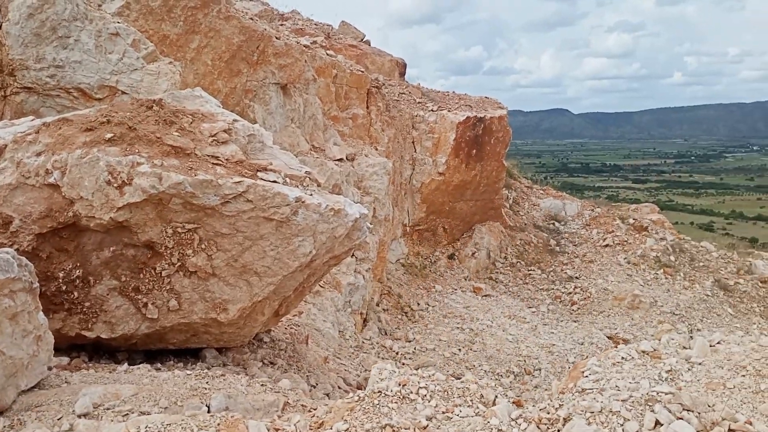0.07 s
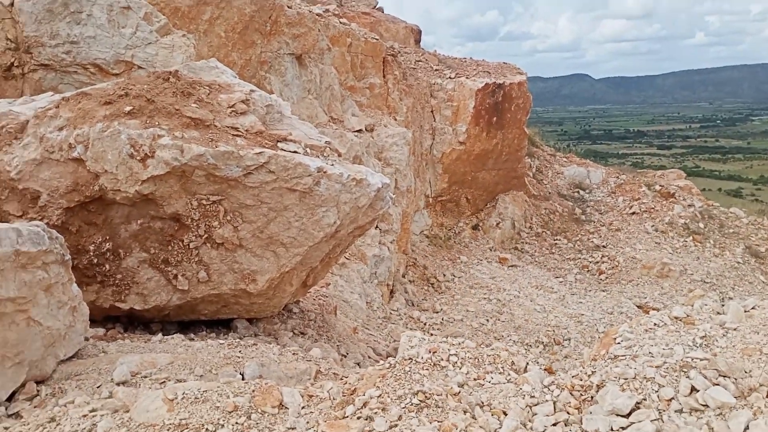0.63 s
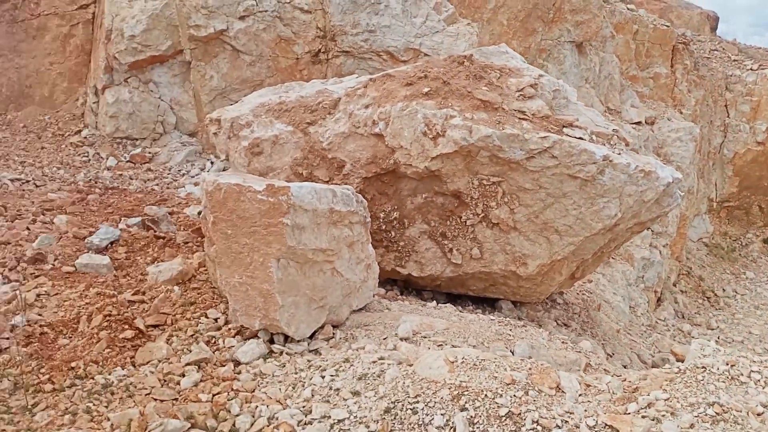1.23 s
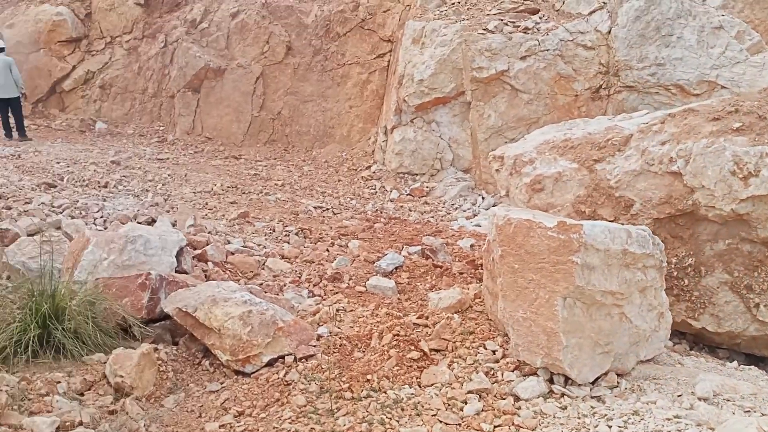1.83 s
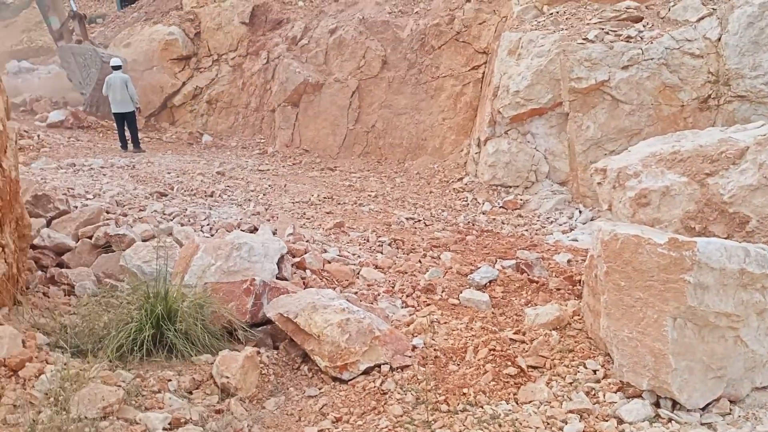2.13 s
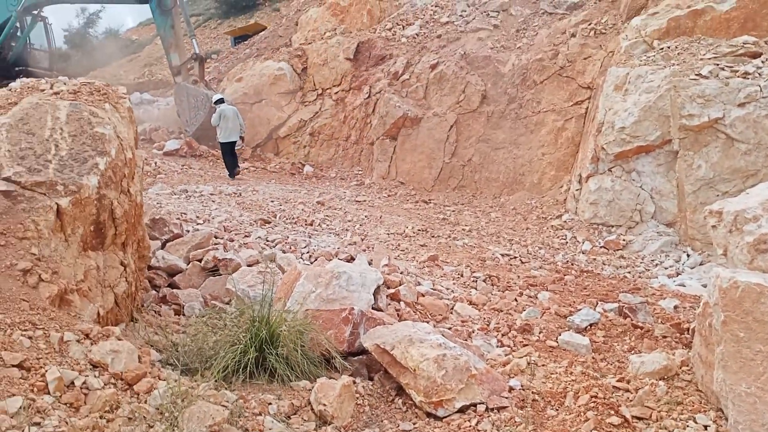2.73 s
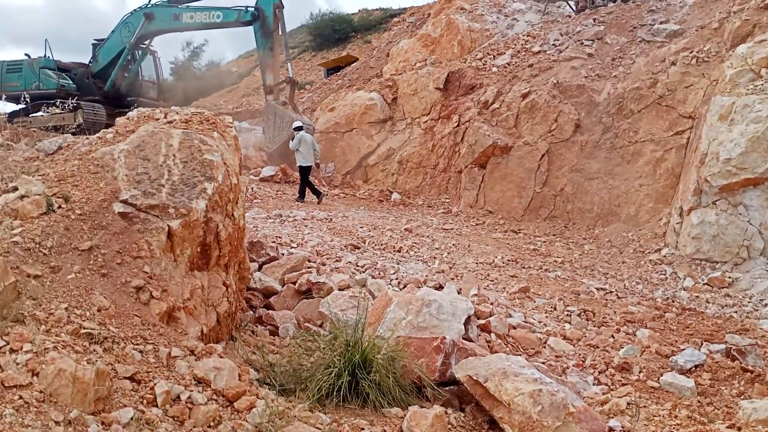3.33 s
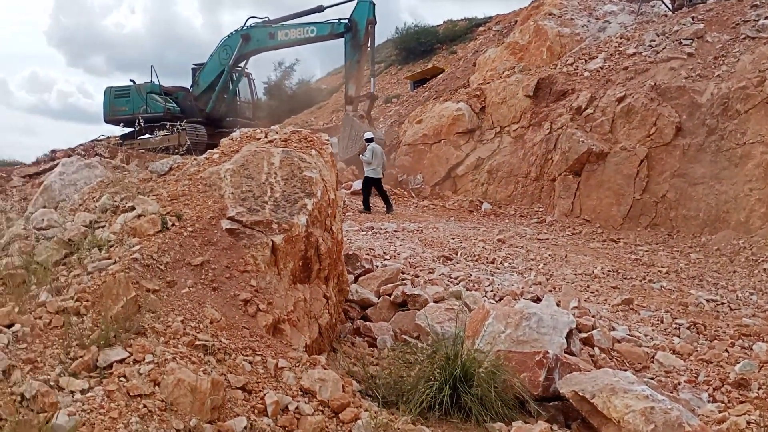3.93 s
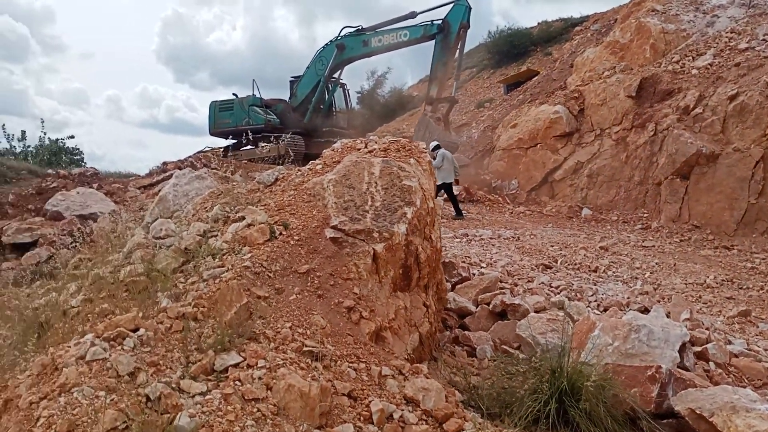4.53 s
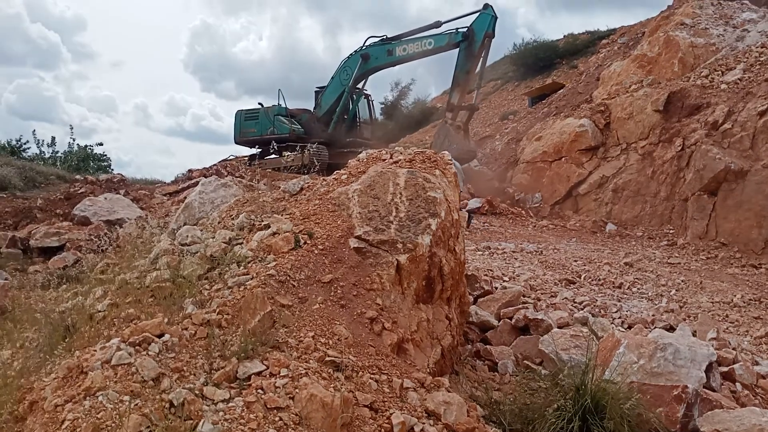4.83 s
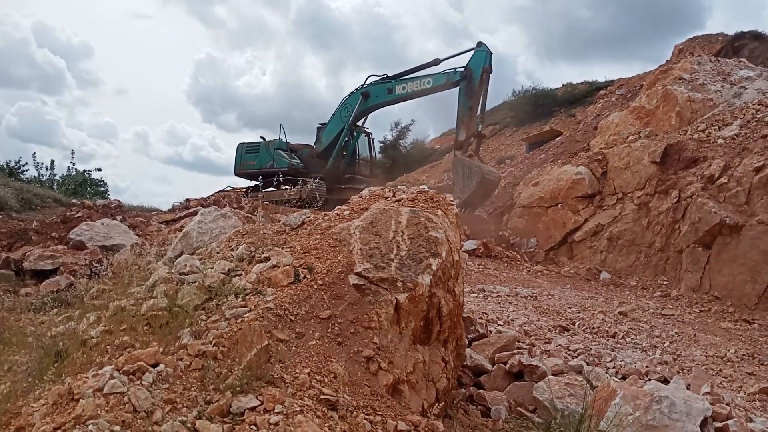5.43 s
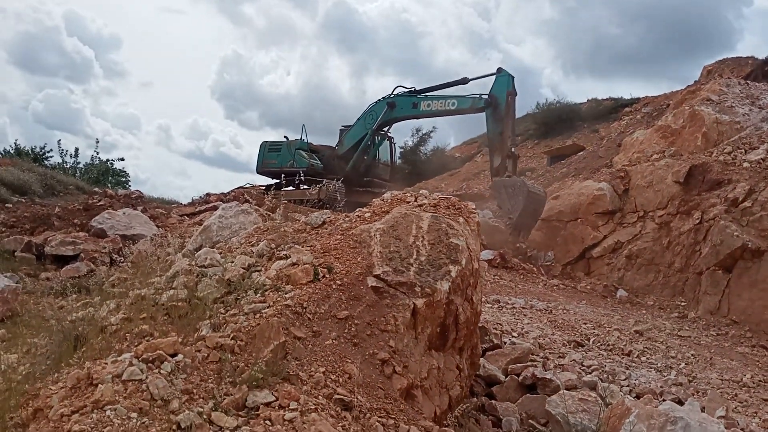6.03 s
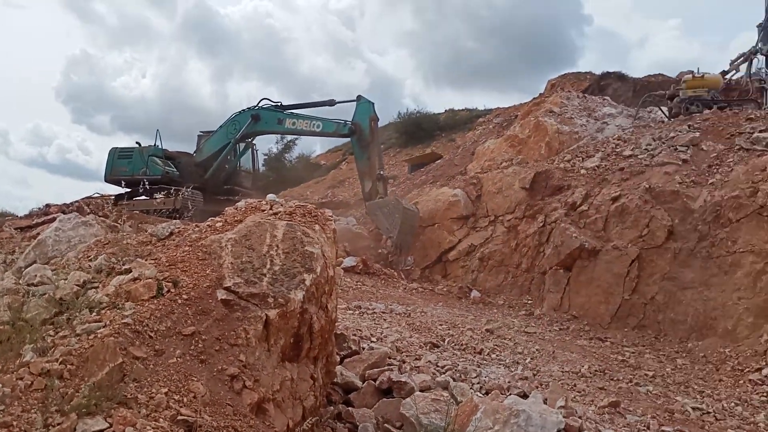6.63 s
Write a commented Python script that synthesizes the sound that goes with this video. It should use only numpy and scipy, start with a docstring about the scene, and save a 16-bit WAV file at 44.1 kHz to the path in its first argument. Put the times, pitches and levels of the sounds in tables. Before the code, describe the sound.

Close footsteps shift quarry rubble, stones clinking and slabs thudding, while far off a diesel excavator hums and its bucket booms softly.

```python
"""Loose quarry rock crunches and clatters under someone's feet, close by.
Each shift of weight drives a burst of small impacts: grit and stones answer first, then slabs rock
and the ground thuds. Single stones clink or hum in their natural modes. Far off an excavator's
diesel drones and rock sets its steel bucket booming. A gritty hiss fades away,
and a faint high whine enters later."""
import sys
import numpy as np
from scipy import signal
from scipy.fft import rfft, irfft
from scipy.io import wavfile

SR = 44100
rng = np.random.default_rng(int(sys.argv[2]) if len(sys.argv) > 2 else 0)


def pcm_store(signal):
    """Save signal as 16-bit PCM."""
    levels = np.round(np.clip(np.atleast_2d(signal), -1, 1) * 32767)
    wavfile.write(sys.argv[1], SR, levels.astype(np.int16).T)


N = 294588

# spectral envelopes: (frequency [Hz], gain [dB])
AIR_SPECTRUM = [(25, -14), (45, -0.5), (65, 0.5), (140, 3), (250, -1.5), (600, -2.5), (1000, -3),
                (2200, -0.5), (3500, -9.5), (7000, -10.5), (10000, -15.5), (15000, 1.5)]
HISS_SPECTRUM = [(100, -51), (500, -26.5), (1000, -16), (1500, 0), (2400, -2.5), (4000, -5), (5500, -13),
                 (7000, -10), (9000, -12), (15000, 1.5)]
THUD_SPECTRUM = [(25, -30), (45, -8.5), (60, -15), (90, -8.5), (160, 0), (250, -5), (340, -14.5), (600, -6),
                 (1200, -55), (4000, -90)]
SLAB_SPECTRUM = [(40, -83.5), (150, -36), (310, -25.5), (420, 9), (530, 3.5), (760, -5.5), (1000, -5),
                 (1400, 1), (2500, -62), (5000, -44)]
GRIT_SPECTRUM = [(30, -68.5), (100, -32.5), (300, -1), (900, -9), (1800, 0.5), (4000, 0.5), (5200, 0.5),
                 (6300, 3), (7400, -5.5), (15000, -25)]
MICROPHONE_RESPONSE = [(28, -19), (45, -13), (62, 0), (7600, -1), (8100, -12), (9400, -15), (10000, -24.5),
                       (10900, -24), (13500, -29.5), (15000, -31.5)]
# partials of the diesel's firing: (frequency [Hz], relative level [dB])
DIESEL_PARTIALS = [(87, -11.5), (130, -13.5), (174, -12.5)]
# course of the whine: (time [s], pitch [Hz])
WHINE_GLIDE = [(2.8, 12277), (3.33, 13088), (3.64, 12623), (4.27, 12956), (4.7, 12525), (5.94, 12554),
               (6.31, 12926), (6.5, 12304)]
# rock meets the bucket: (time [s], relative level [dB])
BUCKET_IMPACTS = [(1.63, -37.5), (2.04, -33), (2.12, -39), (2.235, -35.5), (2.37, -38.5), (2.57, -44.5),
                  (2.7, -30), (4.03, -37.5), (4.8, -30.5), (5.49, -27), (5.71, -42), (6.015, -32.5)]
# modes of the steel bucket: (frequency [Hz], bandwidth [Hz], relative level [dB])
SHELL_MODES = [(540, 12, -2), (609.8, 11.3, 10), (704, 11, -49)]
# modes of a ringing stone or slab: (frequency / pitch [ratio], relative level [dB])
RING_MODES = [(0.999, -2.5), (1.045, -23), (1.37, -30), (1.832, -25)]
# a big slab tips and hums: (time [s], relative level [dB], pitch [Hz])
SLAB_TIPS = [(.499, -20, 415.4), (2.706, -17.5, 714), (2.8, -32, 152), (3.084, -30.5, 533),
             (3.652, -17, 546.5), (4.027, -18, 87.6), (4.778, -13.5, 526), (5.143, -17, 520),
             (5.39, -25, 530)]
# resonances shared by the whole bed of rubble: (frequency [Hz], bandwidth [Hz], gain [dB])
BED_RESONANCES = [(149, 20, 1.5), (1680, 23, 10), (2420, 21, 10.5), (2760, 50, -1), (3560, 130, 2),
                  (3950, 37, 7), (4345, 110, 3), (6060, 83, -13), (10850, 740, 5), (14800, 1800, 14)]
# rock knocks on rock: (time [s], relative crack level [dB], relative ring level [dB], pitch [Hz])
ROCK_KNOCKS = [(.104, -11, -26, 3900), (0.244, -6.5, -11, 4120), (0.249, -17, -7, 3980),
               (0.473, -14, -15, 1572), (.494, -12, -11.5, 2970), (.758, -11, -20, 3340),
               (1.554, -47, -21.5, 2610), (1.604, -35, -21, 2430), (1.7, -41, -26, 2350),
               (2.025, -47, -18.5, 2245), (2.126, -47, -22, 1690), (2.697, -17.5, -22, 5040),
               (2.839, -41, -30, 2290), (2.989, -46, -26, 1540), (3.627, -37, -27, 3380),
               (3.653, -12.5, -33, 2800), (3.907, -17, -19, 1377), (3.978, -19, -21, 1600),
               (4.027, -20.5, -32, 2450), (4.09, -33, -17.5, 2475), (4.116, -17.5, -36, 3500),
               (4.54, -27, -24, 1564), (4.78, -13, -26, 970), (5.462, -30, -14, 3510),
               (5.635, -26.5, -19, 2010), (5.976, -44, -20.5, 2606), (6.321, -39.5, -40, 6600)]
# shifts of weight: (time [s], time under load [s], relative stone level [dB],
# thud against stones [dB], grit offset [dB], middle pitch of the stones [Hz])
WEIGHT_SHIFTS = [(0.004, 0.057, -20, -16, -2, 3370), (0.096, 0.066, -24, -14.5, -5, 3270),
                 (0.184, 0.033, -20, -14.5, -6.5, 2480), (0.237, 0.014, -15, -27, -5.5, 4040),
                 (0.283, .05, -22.5, -10.5, -8, 2730), (0.395, 0.052, -27, -38, -12, 2370),
                 (0.468, 0.038, -24, -40, -5.5, 1800), (0.491, 0.055, -17, -23, -6.5, 3200),
                 (0.690, 0.067, -30.5, -39, -16, 2100), (0.754, 0.064, -16, -27, -19, 2880),
                 (0.841, 0.0072, -24.5, -33, -31, 2370), (1.180, .08, -42.5, -28, -20, 2420),
                 (1.485, 0.0088, -39, -13, -11, 2300), (1.550, 0.025, -33.5, -35, -35, 2530),
                 (1.600, 0.019, -29, -30, -32, 2590), (1.697, .005, -42.5, -32, -31, 2310),
                 (1.834, 0.044, -42.5, -15, -25, 1860), (2.021, 0.092, -32, -22, -42, 1900),
                 (2.354, 0.022, -33, -37, -20, 1970), (2.658, 0.051, -32.5, -30, -9, 1840),
                 (2.693, 0.018, -25, -17.5, 0.5, 1770), (2.722, 0.032, -31, -4, -13, 1530),
                 (2.800, 0.049, -34.5, -5.5, -21, 2040), (2.972, 0.097, -45, -1.5, -25, 1540),
                 (3.080, 0.059, -44, -12.5, -30, 1960), (3.49, 0.021, -42, -6, -35, 1280),
                 (3.645, 0.029, -26, -29, 2.5, 1730), (3.800, 0.16, -41.5, -3, -12, 1300),
                 (3.904, 0.11, -34, 2, -13.5, 1470), (4.018, 0.019, -29.5, 1.5, -1, 1910),
                 (4.084, 0.068, -29.5, -3, -0.5, 2310), (4.214, 0.098, -47.5, 2, -13, 900),
                 (4.367, 0.019, -40, -11, -7.5, 1300), (4.459, 0.006, -39.5, -6, -15, 2160),
                 (4.517, .031, -32.5, -12, -14, 1540), (4.649, 0.3, -46, -0.5, -7, 2800),
                 (4.761, 0.068, -24.5, -9.5, 1, 1400), (4.96, 0.046, -47.5, -2.5, -3, 2480),
                 (5.019, 0.029, -38.5, -15, -17, 1860), (5.123, 0.024, -21, -27.5, -2, 2870),
                 (5.259, 0.043, -43.5, -20, -2, 2210), (5.317, 0.027, -29, 1, -10.5, 1600),
                 (5.352, 0.081, -26.5, -9, -4.5, 2700), (5.446, .028, -24, -4.5, -2, 2450),
                 (5.553, .04, -39, -0.5, -10.5, 1990), (5.626, 0.035, -37, -24, -5, 1950),
                 (5.830, 0.03, -50.5, -1.5, -14, 1770), (5.909, 0.042, -46.5, -1, -21, 1790),
                 (5.971, 0.051, -31, -24, -16, 3080)]

BURST_SAMPLES = 24000  # length of one burst of impacts
BURST_TIME_S, BURST_HZ = np.arange(BURST_SAMPLES) / SR, np.fft.rfftfreq(BURST_SAMPLES, 1 / SR)
TIME_S = np.arange(N) / SR


def amp(db):
    """Amplitude grows tenfold with every 20 dB."""
    return 10 ** (np.asarray(db) / 20)


def unit(x):
    """Normalisation to rms 1."""
    return x / np.sqrt(np.mean(x ** 2) + 1e-20)


def gain_db(spectrum, hz):
    """Interpolation of a spectral envelope on a log-frequency axis."""
    f, db = np.transpose(spectrum)
    return np.interp(np.log(hz + 1), np.log(f), db)


def add(mix, s, sound):
    """Superposition: a sound joins the mix at time s."""
    part = mix[max(round(s * SR), 0):][:len(sound)]
    part += sound[:len(part)]


def causal(db):
    """Causality: the minimum-phase response with this gain rings only after its cause."""
    log_gain = np.log(amp(np.maximum(np.r_[db, db[-2:0:-1]], -100)))
    return np.exp(np.conj(signal.hilbert(log_gain)))[:len(db)]


def tint(x, spectrum):
    """Zero-phase filtering imposes a spectral envelope."""
    hz = np.fft.rfftfreq(len(x), 1 / SR)
    return irfft(rfft(x) * amp(gain_db(spectrum, hz)), len(x))


def drift(size, cutoff_hz):
    """Low-passed noise gives a smooth random fluctuation of rms 1."""
    hz = np.fft.rfftfreq(size, 1 / SR)
    return unit(irfft(rfft(rng.standard_normal(size)) / (1 + (hz / cutoff_hz) ** 4), size))


def contacts(size, per_s, spread_db):
    """A Poisson process: clicks at independent moments, their heights following a capped power law."""
    chance, height = rng.random((2, size))
    hit, out = chance < per_s / SR, np.zeros(size)
    swing = 2 * height[hit] - 1
    out[hit] = np.sign(swing) * amp(spread_db * np.minimum(-np.log(abs(swing) + 1e-9), 3.2))
    return out


def load(t, rise, hold, t60):
    """Exponential relaxation: an envelope rises, holds, then falls 60 dB in t60 (all times in s)."""
    return (1 - np.exp(-t / rise)) * amp(-60 * np.maximum(t - hold - rise, 0) / t60)


def open_air():
    """Broadband noise, slightly modulated in amplitude, is the sound of the open air."""
    noise = unit(tint(rng.standard_normal(N), AIR_SPECTRUM))
    return noise * amp(6.5 + 0.41 * drift(N, cutoff_hz=9.9))


def diesel():
    """Periodic firing gives partials that waver together in pitch and separately in level."""
    speed = 1 + 0.01 * drift(N, cutoff_hz=2.5)
    phase_per_hz = 2 * np.pi * np.cumsum(speed) / SR
    return sum(amp(db + 1.7 * drift(N, cutoff_hz=8.4)) * np.sin(hz * phase_per_hz)
               for hz, db in DIESEL_PARTIALS)


def hiss():
    """Shot noise: dense clicks merge into a gritty hiss that fades slowly, then quickly."""
    grains = unit(tint(contacts(N, per_s=7800, spread_db=3.0), HISS_SPECTRUM))
    flicker_db = 2.0 * drift(N, cutoff_hz=11)
    level_db = -31 - 3.5 * TIME_S - 44 * np.maximum(TIME_S - 2.75, 0)
    return grains * amp(level_db + flicker_db)


def whine():
    """Frequency modulation: a thin tone glides and jitters, growing louder as it climbs."""
    times, pitches = np.transpose(WHINE_GLIDE)
    glide_hz = np.interp(TIME_S, times, pitches)
    hz = glide_hz * (1 + 0.011 * drift(N, cutoff_hz=300))
    db = -48 + 190 * np.log2(glide_hz / 13100) + 4 * drift(N, cutoff_hz=4.8)
    return amp(db) * (TIME_S > times[0]) * np.sin(2 * np.pi * np.cumsum(hz) / SR)


def bucket():
    """Convolution: each contact of tumbling rock excites the damped modes of the steel shell."""
    t, out = np.arange(SR // 2) / SR, np.zeros(N)
    shell = sum(amp(db) * np.sin(2 * np.pi * hz * t) * np.exp(-np.pi * width * t)
                for hz, width, db in SHELL_MODES)
    force = load(t, rise=0.0044, hold=0.0048, t60=0.35)
    for s, db in BUCKET_IMPACTS:
        impacts = force * contacts(len(t), per_s=490, spread_db=3.0)
        boom = signal.fftconvolve(impacts, shell)[:len(t)]
        add(out, s, amp(db) * unit(boom) * np.sqrt(np.mean(force ** 2)))
    return out


def clinks_and_hums():
    """Free vibration: a rocking stone or slab rings unsteadily; smaller ones speak and die sooner."""
    t, out = np.arange(SR // 2) / SR, np.zeros(N)
    struck_stones = [(s, db, hz) for s, _, db, hz in ROCK_KNOCKS]
    for s, db, hz in struck_stones + list(SLAB_TIPS):
        bulk = 567 / max(hz, 250)  # below 250 Hz the ground's damping limits the ring
        t60, rise = 0.24 * bulk ** 0.5, 0.0067 * bulk ** 1.5
        ring = np.zeros(len(t))
        for ratio, mode_db in RING_MODES:
            wobble = 0.47 * drift(len(t), cutoff_hz=12 / t60)
            ring += amp(mode_db) * np.sin(2 * np.pi * hz * ratio * t + wobble)
        add(out, s, amp(db) * ring * load(t, rise, 0, t60))
    return out


def stone_response(t60=0.053, ring_db=3.0, modes=44):
    """An irregular body has inharmonic modes: the spectrum of one tick and its short ring."""
    t = np.arange(6144) / SR
    place, phase, strength = rng.random((3, modes, 1))
    hz = 500 + 14500 * (np.arange(modes)[:, None] + 1.5 * place) / modes
    decay = 1000 ** (-t / (t60 * (2000 / hz) ** 0.46))  # t60 holds at 2 kHz; higher modes die sooner
    ring = ((0.049 + strength) * np.sin(2 * np.pi * (hz * t + phase)) * decay).sum(0)
    knock = amp(ring_db) * ring / np.linalg.norm(ring)
    knock[0] += 1  # the tick
    return rfft(knock, BURST_SAMPLES)


def on_bed(db):
    """Resonance: the bed adds its peaks and dips to a spectrum, giving a causal response."""
    bed_db = sum(gain / (1 + (2 * (BURST_HZ - hz) / width) ** 2) for hz, width, gain in BED_RESONANCES)
    return causal(db + bed_db)


def heap(pitch_hz, octaves):
    """Size sets pitch: like stones share a spectral hump and, being small, radiate little bass."""
    hump_db = -25 * np.log10(1 + (np.log2((BURST_HZ + 1) / pitch_hz) / (2 * octaves)) ** 2)
    bass_cut_db = -10 * np.log10(1 + (220 / (BURST_HZ + 1)) ** 2)
    return on_bed(hump_db + bass_cut_db)


def clatter(stones, colour, force, per_s, spread_db):
    """Impact excitation: a stone chatters under the force, and its neighbour more faintly."""
    pair = stones[rng.integers(0, len(stones), 2)] * amp([[0], [-7]])
    spectrum = sum(rfft(force * contacts(BURST_SAMPLES, per_s, spread_db)) * stone for stone in pair)
    return unit(irfft(colour * spectrum, BURST_SAMPLES)) * np.sqrt(np.mean(force ** 2))


def cracks(stones):
    """Rough contact: in a hard knock, rock faces meet at many points within milliseconds."""
    out = np.zeros(N)
    force = load(BURST_TIME_S, rise=0.0012, hold=0.003, t60=0.018)
    for s, db, _, pitch_hz in ROCK_KNOCKS:
        crack = clatter(stones, heap(pitch_hz, octaves=0.49), force, per_s=4000, spread_db=-0.5)
        add(out, s, amp(db - 2.5) * crack)
    return out


def footsteps(stones):
    """Inertia: grit and stones answer a step at once; slabs and ground follow and settle more slowly."""
    t, out = BURST_TIME_S, np.zeros(N)
    thud_colour = on_bed(gain_db(THUD_SPECTRUM, BURST_HZ))
    grit_colour = on_bed(gain_db(GRIT_SPECTRUM, BURST_HZ))
    zing_colour = causal(-20 * np.log10(1 + ((BURST_HZ - 10620) / 490) ** 2))
    zing_force = load(t, rise=0.0035, hold=0.0097, t60=0.2)
    thud_lag_s = 0.01404  # the weight reaches the ground after the stones give way
    for s, hold, db, thud_db, grit_db, pitch_hz in WEIGHT_SHIFTS:
        stone_force = load(t, rise=0.0015, hold=hold, t60=0.2)
        crowd = np.clip(amp(0.4 * (db + 24.5)), 0.4, 1.6)  # a harder step moves more pieces
        grit = clatter(stones, grit_colour, stone_force, per_s=1000 * crowd, spread_db=2.0)
        add(out, s, amp(db + grit_db + 3.0) * grit)
        if grit_db > -5:  # only a very gritty step zings
            zing = clatter(stones, zing_colour, zing_force, per_s=900, spread_db=2.5)
            add(out, s, amp(db + 3.5 * grit_db - 6) * zing)

        stone_colour = heap(pitch_hz, octaves=0.31)
        rattle = clatter(stones, stone_colour, stone_force, per_s=1000 * crowd, spread_db=3.5)
        add(out, s, amp(db) * rattle)

        slab_size = (2020 / pitch_hz) ** 0.13  # smaller stones lie on smaller slabs
        slab_colour = on_bed(gain_db(SLAB_SPECTRUM, BURST_HZ * slab_size))
        slab_force = load(t, rise=0.013, hold=hold, t60=0.23)
        slabs = clatter(stones, slab_colour, slab_force, per_s=580, spread_db=1.0)
        rocking = np.linalg.norm(amp([-15.5, grit_db - 5, thud_db]))  # driven by stones, grit, ground
        add(out, s, amp(db) * rocking * slabs)

        ground_force = load(t, rise=0.011, hold=hold, t60=0.24)
        thud = clatter(stones, thud_colour, ground_force, per_s=300, spread_db=2.0)
        add(out, s + thud_lag_s, amp(db + thud_db) * thud)
    return out


def scene():
    """Free-field superposition: near rubble and far machine add without echo in the open pit."""
    stones = np.array([stone_response() for _ in range(28)])
    rubble = footsteps(stones) + cracks(stones)
    impacts = amp(-0.31) * rubble + amp(-1.5) * clinks_and_hums() + amp(-0.5) * bucket()
    distant = (diesel() + open_air()) * amp(-50 - 0.67 * TIME_S)
    return (impacts + distant + hiss() + whine())[None]


def record(dry):
    """Band limiting: a small microphone, dull in the top octave, then a steep low-pass filter."""
    low_pass = signal.firwin(511, 15700, window=("kaiser", 9), fs=SR)
    return signal.oaconvolve(tint(dry[0], MICROPHONE_RESPONSE), low_pass, "same")[None]


dry = scene()
out = record(dry)
pcm_store(out)
```